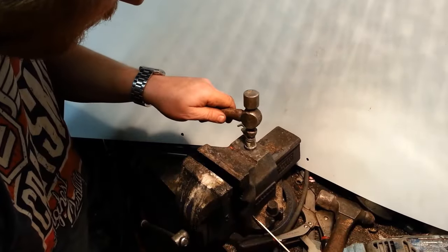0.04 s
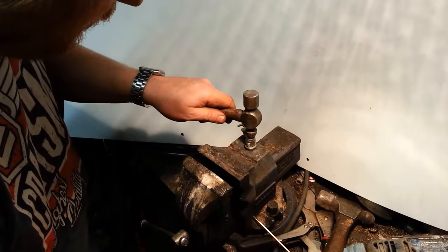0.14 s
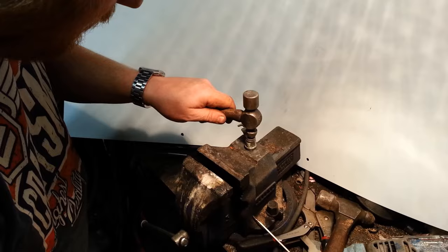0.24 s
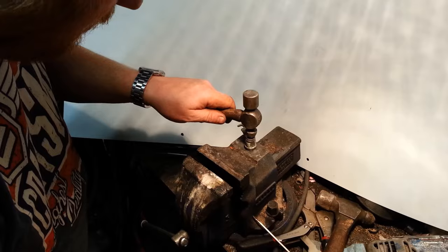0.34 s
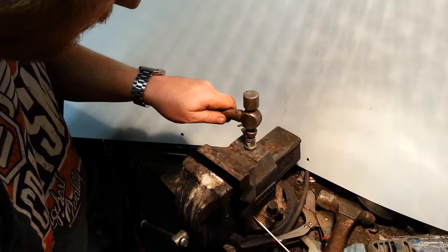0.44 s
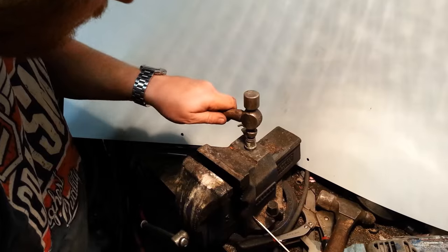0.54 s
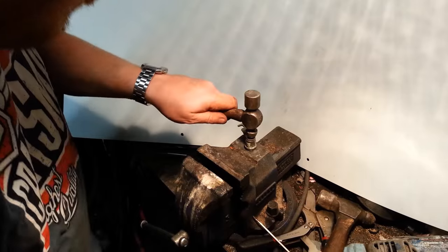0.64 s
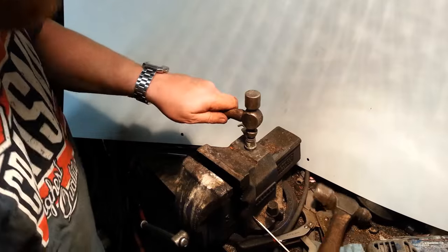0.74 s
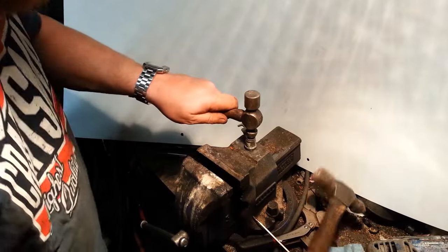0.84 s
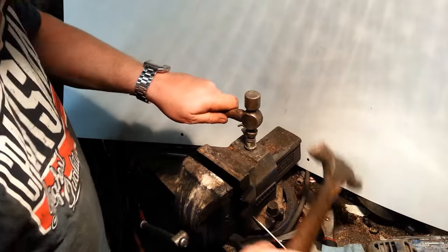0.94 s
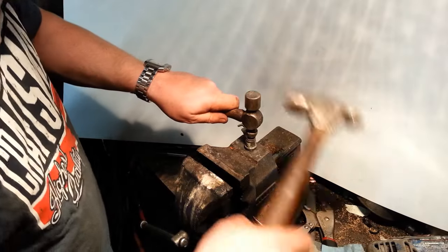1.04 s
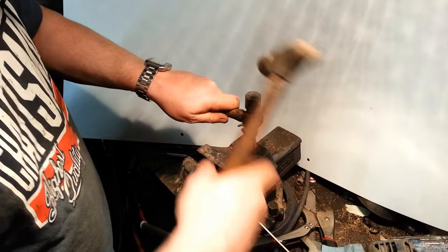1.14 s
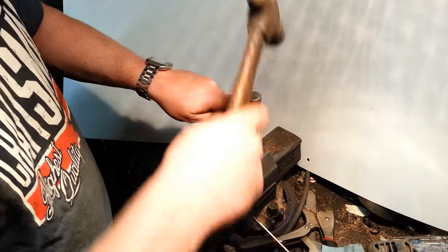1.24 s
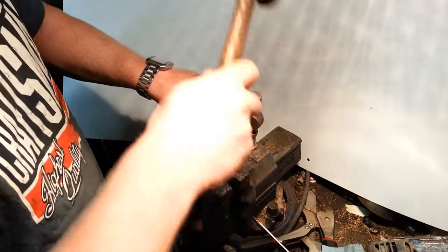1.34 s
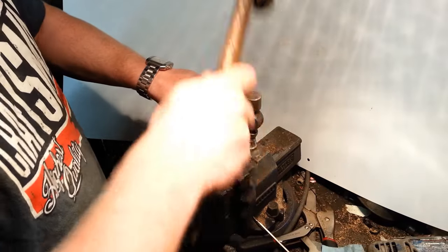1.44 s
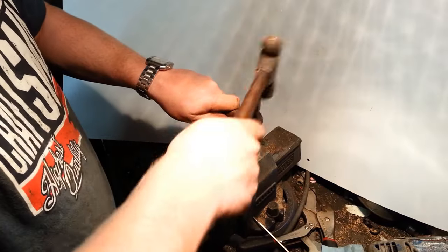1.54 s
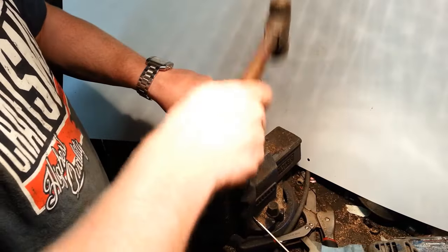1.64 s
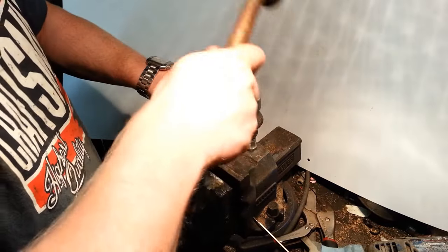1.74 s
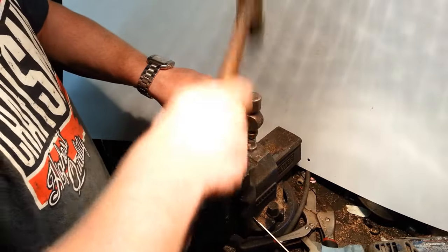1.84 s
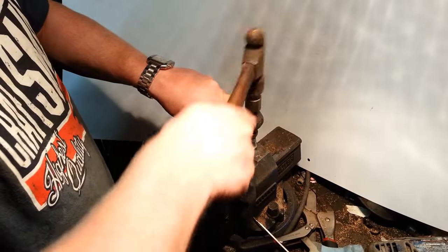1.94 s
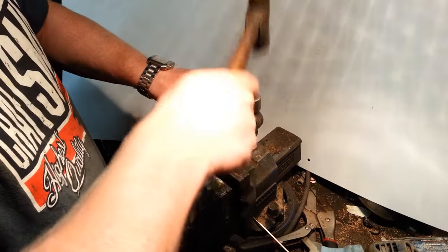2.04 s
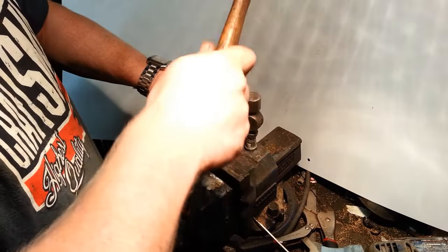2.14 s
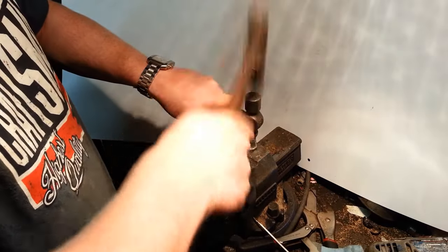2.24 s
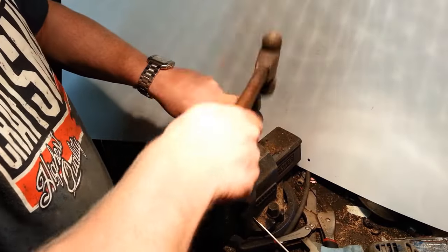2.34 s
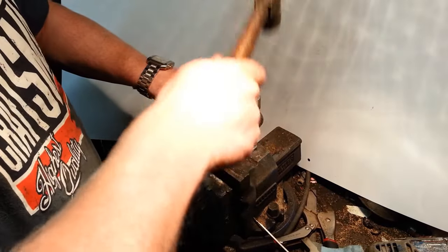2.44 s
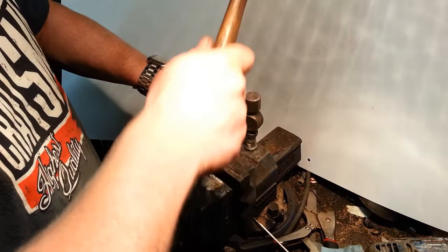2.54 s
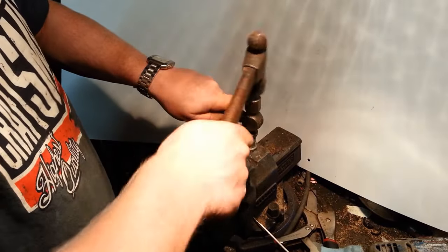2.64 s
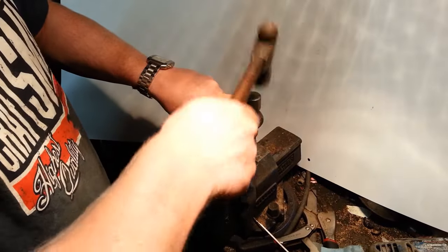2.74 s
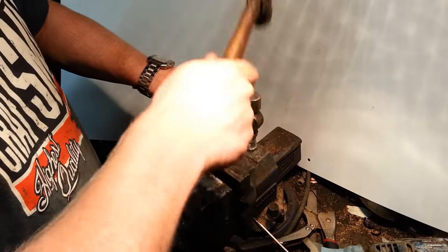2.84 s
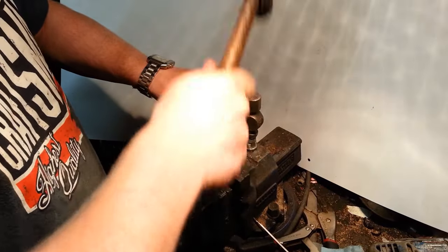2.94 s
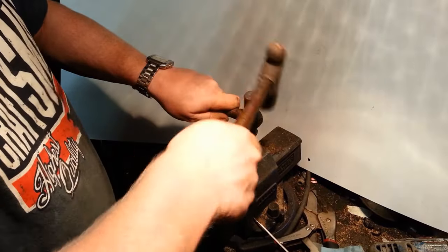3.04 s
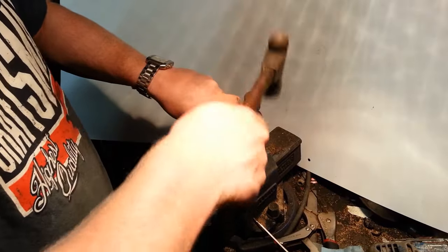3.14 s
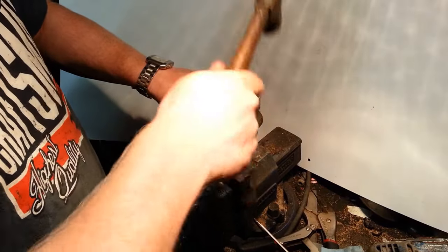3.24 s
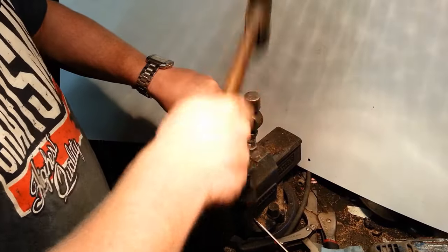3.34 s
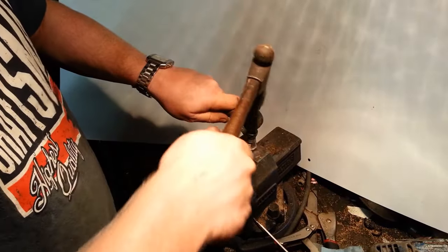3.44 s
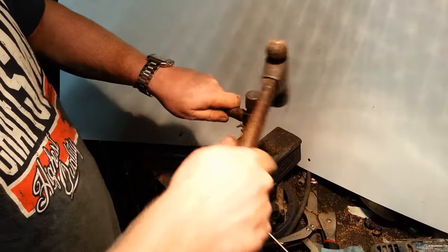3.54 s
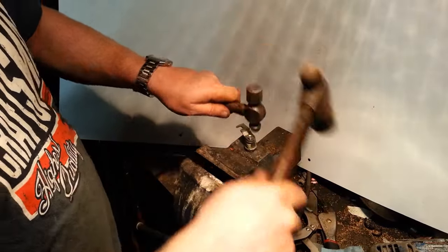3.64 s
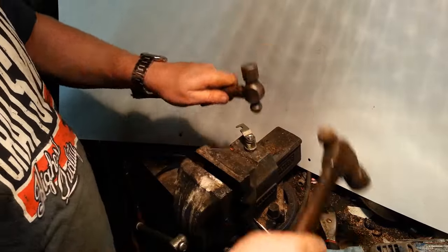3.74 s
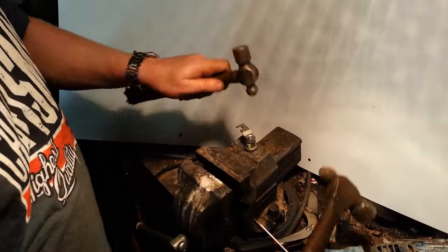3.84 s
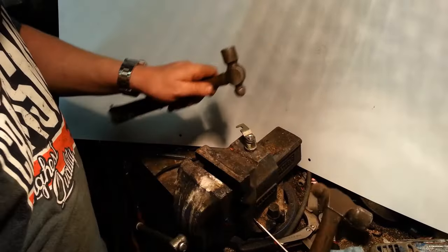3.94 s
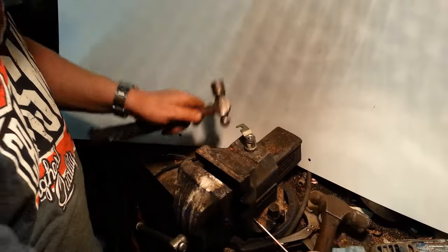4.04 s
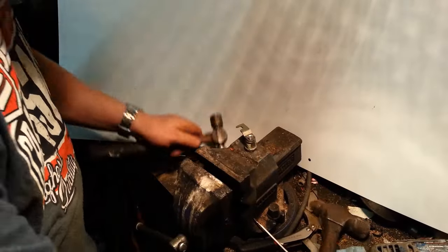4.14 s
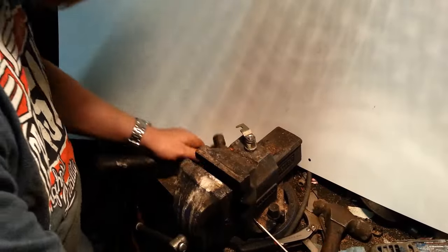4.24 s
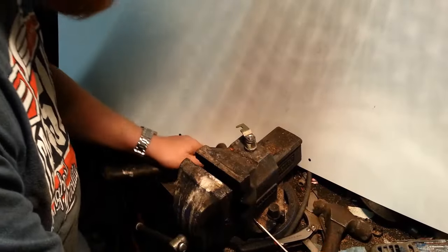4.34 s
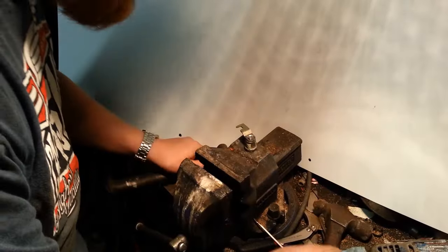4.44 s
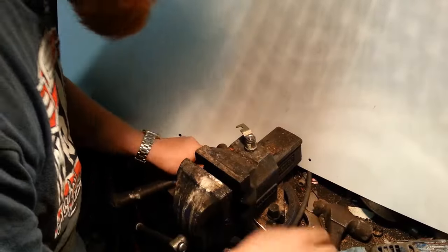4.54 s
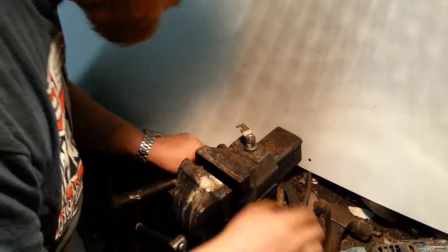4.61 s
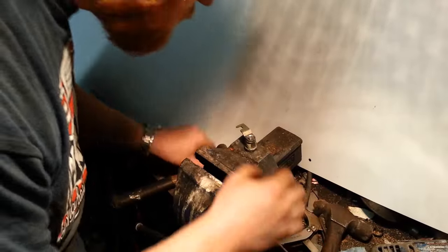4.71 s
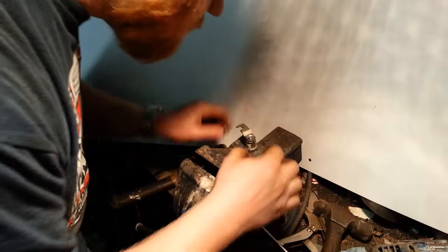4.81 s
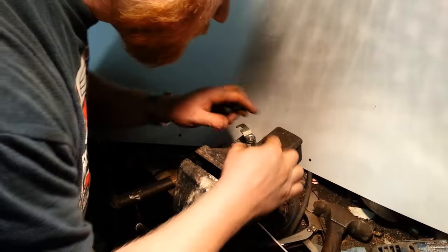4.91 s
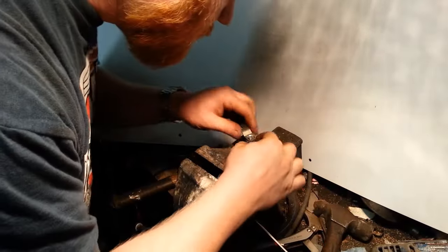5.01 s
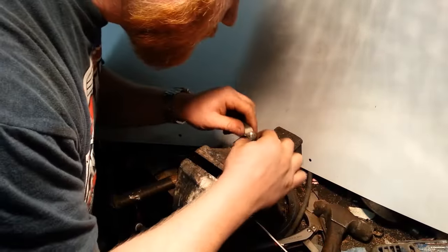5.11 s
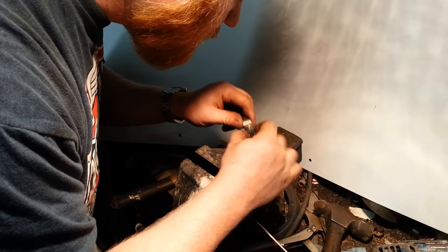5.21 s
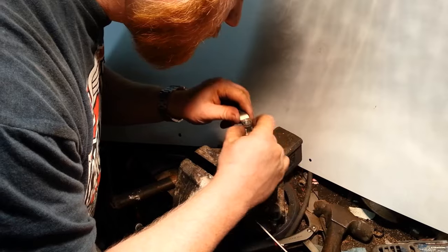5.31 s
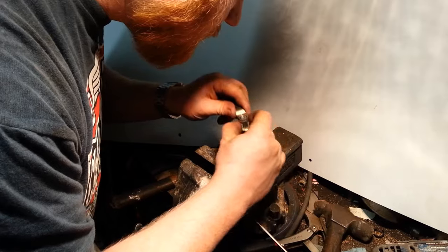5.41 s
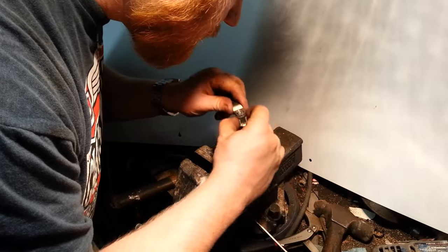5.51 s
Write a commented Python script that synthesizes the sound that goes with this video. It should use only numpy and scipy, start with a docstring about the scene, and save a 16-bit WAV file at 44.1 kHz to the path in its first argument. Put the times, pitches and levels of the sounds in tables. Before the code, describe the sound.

Six hard, evenly spaced hammer blows crack on steel held in a bench vise, clipping the close microphone, then the hammers clatter down.

```python
"""A small workshop: a hammer strikes a second hammer held on a part in a cast bench vise, six hard blows.
Each is a noise crack over the casting's dying noise, with bench and loose-tool modes; five weak rebounds follow.
Thuds and clanks are tools meeting the bench, at the end both hammers laid down; a loose tool rocks,
clicks tick, a sleeve brushes and small parts murmur. All of it echoes in the shop, over steady hum and hiss.
The blows overload the near microphone's input, which clips them flat."""
import sys
import numpy as np
from scipy import signal
from scipy.fft import rfft, irfft
from scipy.io import wavfile

SR = 44100
rng = np.random.default_rng(int(sys.argv[2]) if len(sys.argv) > 2 else 0)


def wrap_up_sound(samples):
    """Save the sound to the file named by the first command line argument, as 16-bit audio."""
    columns = np.atleast_2d(samples).T
    # keep every value between -1 and 1, then stretch to whole-number steps
    tamed = np.clip(columns, -1, 1)
    steps = np.round(tamed * 32767).astype(np.int16)
    wavfile.write(sys.argv[1], SR, steps)


N = 245681  # length in samples


def undb(db):
    """Decibels to gain."""
    return 10 ** (np.asarray(db) / 20)


def read(table, hz):
    """A two-column table, frequency and value, read on a log-frequency axis."""
    table_hz, values = np.array(table).T
    return np.interp(np.log(np.maximum(hz, 1)), np.log(table_hz), values)


def fade(size, t60):
    """Exponential decay, 60 dB in t60 seconds."""
    return np.exp(-np.log(1000) * np.arange(size) / SR / np.maximum(t60, 1e-3))


def hump(hz, octaves):
    """Bell-shaped colour around a centre, 6 dB down at the given octaves to either side."""
    return lambda f: -6 * (np.log2(f / hz) / octaves) ** 2


def peaks_db(f, groups):
    """Resonance peaks as a boost in dB, summed over the mode groups."""
    return sum(db / (1 + (2 * (f - hz) / width) ** 2) for hz, width, db in groups)


def noise(size, colour_db):
    """Noise of rms 1 whose spectrum follows colour_db(Hz)."""
    f = np.arange(size // 2 + 1) * SR / size + 1  # 1 Hz up, to keep the logarithms finite
    white = rng.standard_normal(size)
    x = irfft(rfft(white) * undb(colour_db(f)), size)
    return x / np.std(x)


BANDS_HZ = 30 * 2 ** np.arange(0, 9.4, 1 / 3)  # third-octave centres


def dying(size, colour_db, t60s):
    """Coloured noise in which every third-octave band dies at its own rate."""
    spectrum = rfft(noise(size, colour_db))
    f = np.arange(len(spectrum)) * SR / size + 1
    bands_away = 3 * np.log2(f / BANDS_HZ[:, None])
    overlap = np.maximum(1 - np.abs(bands_away), 0)  # triangles that crossfade between neighbours
    bands = irfft(spectrum * overlap, size)
    return np.sum(bands * fade(size, read(t60s, BANDS_HZ)[:, None]), axis=0)


def ring(size, modes, scatter_db, beat_hz=0):
    """Damped modes; each contact draws new strengths, slight detuning and a beat rate for every mode."""
    hz, db, t60 = np.transpose(modes)[:, :, None]
    strength, detune, sign, beat = rng.standard_normal((4, len(modes), 1))
    t = np.arange(size) / SR
    tone = np.sin(2 * np.pi * hz * (1 + 0.001 * detune) * t)
    beating = np.cos(2 * np.pi * beat_hz * beat * t)
    gain = np.sign(sign) * undb(db + scatter_db * strength)
    return np.sum(gain * tone * beating * fade(size, t60), axis=0)


def add(out, s, x):
    """Mix x in at time s."""
    i = int(s * SR)
    out[i:i + len(x)] += x[:N - i]


# Hammer contacts, hard blows and weak rebounds. Each row: start in seconds, force in dB,
# crack pitch in Hz, drive of the loose tool in dB.
CONTACTS = [(1.6149, 0, 2250, -21), (1.969, 2.5, 4830, -10), (1.995, -12, 4050, -24),
            (2.343, 3.5, 4370, -8.5), (2.392, -10, 2200, -23.5), (2.717, 7, 4230, 3),
            (2.787, -15.5, 3916, -15), (3.092, 4, 4800, -5.5), (3.128, -8.5, 4200, -1.5),
            (3.464, 6.5, 4675, 1), (3.516, -9, 2196, -5)]
# Colour of the casting's many close modes, heard as noise. Each row: frequency in Hz, relative level in dB per Hz.
CASTING_COLOUR = [(30, -21), (60, -10.5), (130, -9), (270, -8), (600, 3), (1200, -7.5), (2500, -5),
                  (4300, -9), (6400, -7.5), (10000, -7.5), (13000, -4), (15500, -36)]
# Decay of that noise under a full blow. Each row: frequency in Hz, t60 in seconds.
CASTING_DECAY = [(40, 0.1), (100, 0.33), (250, 0.22), (600, 0.078), (1500, 0.18), (4000, 0.19),
                 (8500, 0.21), (12000, 0.12), (15000, .07)]
# Mode groups that stand out of the casting's noise when fully woken. Each row: centre in Hz, width in Hz, boost in dB.
VISE_GROUPS = [(1147, 150, 6.5), (1403, 29, 12.5), (1730, 20, 7), (1856, 40, 5), (2280, 48, 0.5),
               (2642, 70, -1.5), (3580, 160, 5), (3790, 57, 11), (4140, 150, 7), (4220, 50, 1),
               (4210, 21, 3.5), (4730, 70, 11.5), (4950, 87, 7), (6930, 42, 2), (5440, 60, 8.5),
               (8730, 65, 8.5), (8510, 260, 6), (8300, 640, 4), (8296, 70, 4), (11860, 620, 3.5)]
# Modes of the bench top under a blow. Each row: frequency in Hz, relative level in dB, t60 in seconds.
BENCH_MODES = [(228.4, -8.5, 0.037), (272.8, 2.5, 0.14), (287.2, -11.5, 0.074), (323, 0.5, 0.081),
               (390, -3.5, 0.16), (447.3, -7.5, 0.21), (519.2, -3, 0.14), (590, 3.5, 0.11),
               (675, -4.5, 0.21), (649.7, -6.5, 0.094), (815.3, -3.5, 0.085), (850.3, -0.5, 0.097)]
# Modes of a loose steel tool set ringing. Each row: frequency in Hz, relative level in dB, t60 in seconds.
LOOSE_MODES = [(1186, 1, .6), (1348, 1, .7), (2320, -4, .6), (2900, -8, .35), (3500, -7, .35),
               (4390, -6, .35)]
BENCH_DB, LOOSE_DB = -12, -32  # shares of the bench boom and the loose tool
BRIGHT_DB, BRIGHT_PER_DB = 0.22, 0.1344  # tilt in dB per octave at 0 dB force, and its gain per dB of force
BENCH_PER_DB = 1.15  # dB of bench boom per dB of force
SHORTER_PER_DB = 0.8  # a light contact rings shorter: dB of decay time per dB of force
CLANG_HZ = 4163  # a crack of this pitch wakes the groups fully, a duller one less, a sharper one more


def blows(size=32768):
    """Steel on steel: a short crack, the casting's dense modes, the bench boom and the loose tool's rings."""
    out = np.zeros(N)
    for s, db, crack_hz, ring_db in CONTACTS:
        bright_db = BRIGHT_DB + BRIGHT_PER_DB * db  # a harder contact is brighter
        clang = (crack_hz / CLANG_HZ) ** 0.68

        def colour(f):
            """The casting's colour, tilted by force, with its mode groups woken."""
            tilt_db = bright_db * np.log2(f / 2000)
            return read(CASTING_COLOUR, f) + tilt_db + clang * peaks_db(f, VISE_GROUPS)

        shorten = undb(min(SHORTER_PER_DB * db, 0))
        casting = dying(size, colour, [(hz, t60 * shorten) for hz, t60 in CASTING_DECAY])
        # a glancing, duller contact hardly cracks
        crack = undb(0.5 + 3.4 * bright_db) * noise(size, hump(crack_hz, 0.92)) * fade(size, 0.027)
        # the heavy bench takes a few milliseconds to start moving
        boom = ring(size, BENCH_MODES, 2.5, beat_hz=12) * (1 - fade(size, 0.017))
        bench = undb(BENCH_DB + BENCH_PER_DB * db) * boom
        loose = undb(LOOSE_DB + ring_db) * ring(size, LOOSE_MODES, 1.5, beat_hz=6)
        add(out, s, undb(db) * (casting + crack) + bench + loose)
    return out


# Tools meeting the bench top. Each row: start in seconds, level in dB, thud centre in Hz,
# thud t60 in seconds, clank share in dB.
TOOL_KNOCKS = [(.656, -30, 480, 0.04, -24), (.672, -36, 437, 0.055, -36), (0.721, -42, 500, 0.11, -45),
               (0.7399, -31, 330, 0.078, -17), (3.281, -16.5, 453, 0.033, -20),
               (3.298, -29, 426, 0.08, -11), (4.243, -0.5, 3460, 0.11, -5), (4.272, -8, 351, 0.029, -19),
               (4.348, -24.5, 384, 0.043, -5.5), (4.41, -7, 690, 0.044, -6), (4.466, -32, 670, 0.036, -6),
               (4.6604, -26.5, 415, 0.081, -13), (4.681, -37, 253, 0.17, -10)]
# Mode groups of a hammer head when fully woken. Each row: centre in Hz, width in Hz, boost in dB.
HAMMER_GROUPS = [(2450, 130, 11.5), (2982, 40, 8.5), (3430, 86, 21.5), (3520, 37, 3.5), (3630, 120, 15),
                 (4150, 63, 13.5), (4800, 40, 7.5), (4800, 99, 4), (8400, 53, 5.5), (9110, 51, 8)]
EDGE_DB, EDGE_RATIO = -6, 3.5  # upper body of a thud, and its pitch over the centre
BUMP_DB, KNOCK_BENCH_DB = 2.5, -16  # the first swing, and the bench modes' share
THUD_OCTAVES, THUD_WIDENS = 0.9, 0.59  # thud width at 500 Hz, and its power law in pitch
STEEL_HZ = 3400  # a knock this sharp wakes the hammer head fully, a duller one less


def knocks(size=16384):
    """A thud over damped bench modes and the clank of steel; duller thuds are narrower and push longer."""
    out = np.zeros(N)
    damped = [(hz, db, 0.37 * t60) for hz, db, t60 in BENCH_MODES]
    for s, db, hz, t60, clank_db in TOOL_KNOCKS:
        octaves = THUD_OCTAVES * (hz / 500) ** THUD_WIDENS
        # the woody edge of the thud reaches well above its centre
        edge_colour = hump(EDGE_RATIO * min(hz, 1400), 0.55)
        edge = undb(EDGE_DB) * noise(size, edge_colour) * fade(size, 0.8 * t60)
        # the first swing: two cycles under a smooth window
        cycle = 2 * np.pi * hz * np.arange(size) / SR
        bump = undb(BUMP_DB) * np.cos(cycle) * np.sin(np.minimum(cycle / 4, np.pi)) ** 2

        def thud_colour(f):
            """A hump thinned in the bass, as small tools radiate little of it."""
            return hump(hz, octaves)(f) - 20 * np.log10(1 + (200 / f) ** 2)

        def clank_colour(f):
            """A bright hump with the hammer head's groups, woken by a sharp knock."""
            woken = min(hz / STEEL_HZ, 1) ** 0.53
            return hump(2900, 1.3)(f) + woken * peaks_db(f, HAMMER_GROUPS)

        thud = noise(size, thud_colour) * fade(size, t60)
        bench = undb(KNOCK_BENCH_DB) * ring(size, damped, 3.0)
        clank = undb(clank_db) * noise(size, clank_colour) * fade(size, 0.094)
        push = 1 - fade(size, 12.0 / hz)  # soft onset, slower for a low thud
        add(out, s, undb(db) * (bump + push * (thud + edge + bench) + clank))
    return out


# A loose steel tool hops after a blow, lands and rocks. Each row: landing in seconds, base level in dB.
LANDINGS = [(2.6, -49.5), (2.982, -46), (3.36, -46), (3.736, -42.5)]
# The landing and then each rock in turn, a single column: level in dB over the base level.
ROCK_STEPS_DB = (2.5, 3.5, -6, -11, -11)
FIRST_ROCK_S, ROCK_S = 0.075, 0.067  # wait for the first rock, then the time between rocks
OTHER_END_S, OTHER_END_DB = 0.016, -2.5  # the tool's far end touches later and softer


def rattles(size=16384):
    """Landing and rocks are soft ticks that wake the tool's upper modes; the next contact ends the rocking."""
    out = np.zeros(N)
    upper = [(hz, db, 0.22 * t60) for hz, db, t60 in LOOSE_MODES if hz > 2000]
    rocks = FIRST_ROCK_S + ROCK_S * np.arange(len(ROCK_STEPS_DB) - 1)
    for landing, db in LANDINGS:
        for s, rock_db in zip(landing + np.r_[0, rocks], ROCK_STEPS_DB):
            tick = noise(size, hump(2800, 1.7)) * fade(size, 0.12) * (1 - fade(size, 0.03))
            tick = tick + undb(-2.0) * ring(size, upper, 1.7, beat_hz=11)
            interrupted = any(landing < contact[0] < s for contact in CONTACTS)
            if not interrupted:
                add(out, s, undb(db + rock_db) * tick)
                add(out, s + OTHER_END_S, undb(db + rock_db + OTHER_END_DB) * tick)
    return out


# Tiny dry clicks. Each row: start in seconds, level in dB, centre in Hz, octaves from the centre to 6 dB down.
CLICKS = [(0.567, -32, 9000, 2.1), (0.696, -36, 9800, 1.1), (1.059, -44, 9000, .3),
          (1.476, -27.5, 12300, 0.2), (4.13, -24.5, 3800, 0.93)]


def ticks(size=2048):
    """Clicks a few milliseconds long, each a burst of humped noise."""
    out = np.zeros(N)
    for s, db, hz, octaves in CLICKS:
        add(out, s, undb(db) * noise(size, hump(hz, octaves)) * fade(size, 0.012))
    return out


# A sleeve brushes as the arm swings up. Each row: peak in seconds, peak level in dB.
BRUSHES = [(1.146, -44), (1.261, -39.5)]
SLEEVE_RISE_DB_S, SLEEVE_FALL_DB_S = 220, 450  # slopes in dB per second


def sleeve():
    """Cloth hiss that swells to each brush and drops quickly."""
    t = np.arange(N) / SR
    swell = np.zeros(N)
    for s, db in BRUSHES:
        slope_db = np.minimum(SLEEVE_RISE_DB_S * (t - s), SLEEVE_FALL_DB_S * (s - t))
        swell += undb(db + slope_db)
    return swell * noise(N, hump(11000, 2.2))


CLUTTER_DB, CLUTTER_T60_S = -57.5, 3.4  # murmur after a 0 dB contact or knock, and its decay


def clutter():
    """Small parts on the shaken bench: every contact and knock adds energy to a murmur that dies slowly."""
    power = np.zeros(N)
    for s, db, *_ in CONTACTS + TOOL_KNOCKS:
        add(power, s, (undb(CLUTTER_DB + db) * fade(N, CLUTTER_T60_S)) ** 2)
    return np.sqrt(power) * noise(N, hump(1300, 1.0))


# Decay of the shop's echo. Each row: frequency in Hz, t60 in seconds.
ROOM_DECAY = [(100, 0.72), (500, 0.41), (2000, 0.34), (6000, 0.32), (14000, 0.075)]
ROOM_DB = -18.5  # echo against the near sound


def room_echo(near):
    """The shop's echo: near sounds smeared by dying noise of unit energy."""
    room = dying(32768, hump(1500, 4.7), ROOM_DECAY)
    room = room / np.sqrt(np.sum(room ** 2))
    return undb(ROOM_DB) * signal.fftconvolve(near, room)[:N]


# Colour of the microphone for near sounds and their echo. Each row: frequency in Hz, gain in dB.
CAPSULE_COLOUR = [(60, -1.5), (200, 2.5), (1000, 4), (3000, 0.5), (4800, 1.5), (6200, -7), (9000, -6),
                  (14000, -9.5), (16000, -18)]


def microphone(x, size=2048):
    """The capsule's colour as a causal response, folded from the cepstrum of its log gain."""
    f = np.arange(size // 2 + 1) * SR / size
    cepstrum = irfft(np.log(undb(read(CAPSULE_COLOUR, f))), size)
    cepstrum[1:size // 2] *= 2
    cepstrum[size // 2 + 1:] = 0
    response = irfft(np.exp(rfft(cepstrum)), size)
    return signal.fftconvolve(x, response)[:N]


# Colour of the shop's steady background. Each row: frequency in Hz, relative level in dB per Hz.
SHOP_COLOUR = [(15, -62.5), (25, -34), (43, -29.5), (64, -8.5), (128, -7.5), (224, -5.5), (373, -9.5),
               (450, -11.5), (621, -13.5), (811, -14.5), (1180, -17.5), (4620, -24), (5570, -29),
               (14400, -25.5), (14900, -49.5)]
SHOP_DB = -51.5  # background rms


def shop():
    """Steady hum and hiss as one coloured noise."""
    return undb(SHOP_DB) * noise(N, lambda f: read(SHOP_COLOUR, f))


def scene():
    """Near sounds and their echo through the microphone, over the shop; the same in both channels."""
    near = blows() + knocks() + rattles() + ticks() + sleeve() + clutter()
    heard = microphone(near + room_echo(near))
    return np.tile(heard + shop(), (2, 1))


TOP_HZ = 15600  # upper edge of the passband


def record(dry):
    """The input clips flat on the blows, then a steep low-pass cuts the top."""
    clipped = np.clip(dry, -0.93, 0.93)
    low_pass = signal.ellip(8, 0.2, 60, TOP_HZ, fs=SR, output="sos")  # 0.2 dB ripple, 60 dB stop
    return signal.sosfilt(low_pass, clipped)


dry = scene()
out = record(dry)
wrap_up_sound(out)
```